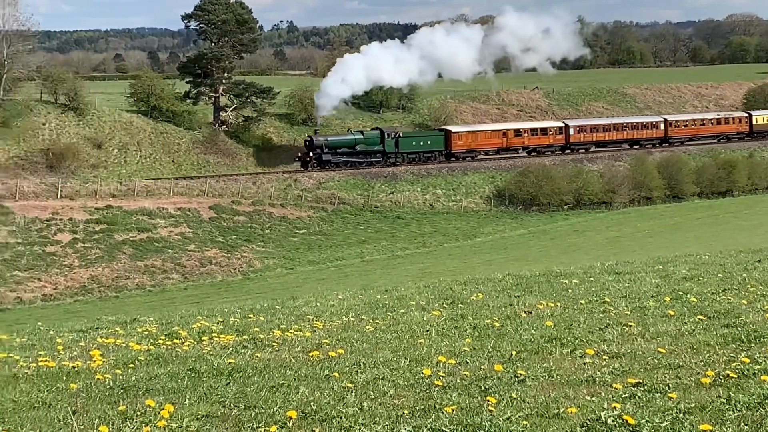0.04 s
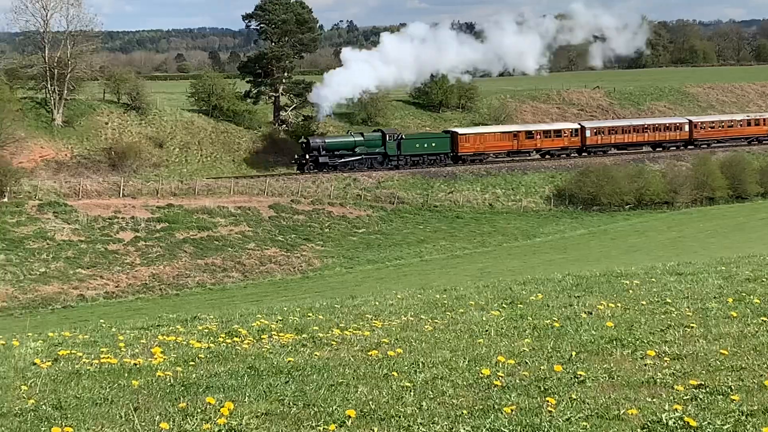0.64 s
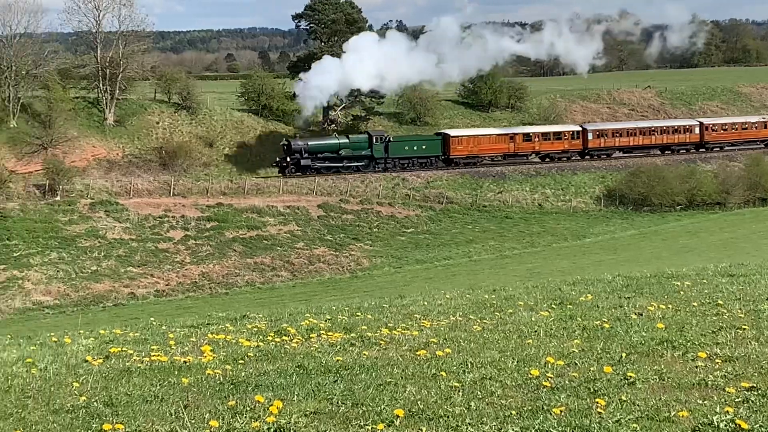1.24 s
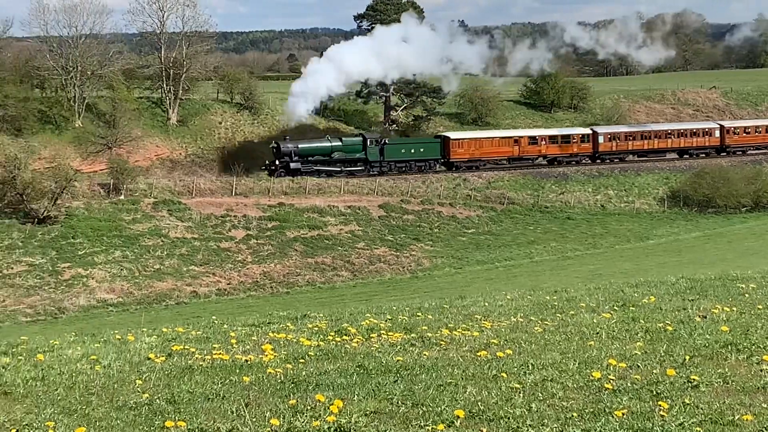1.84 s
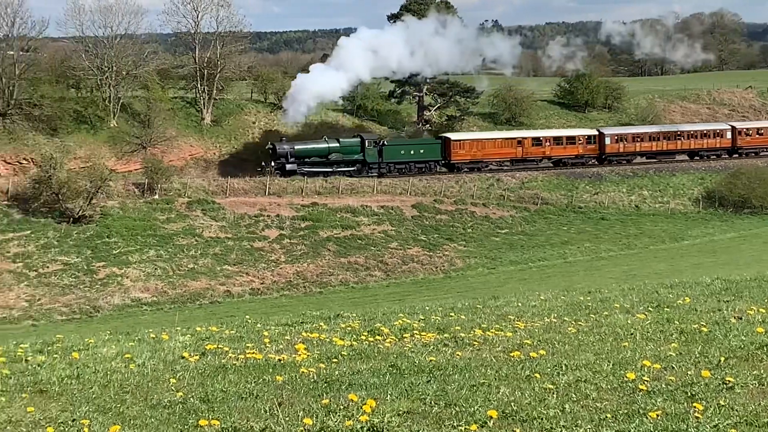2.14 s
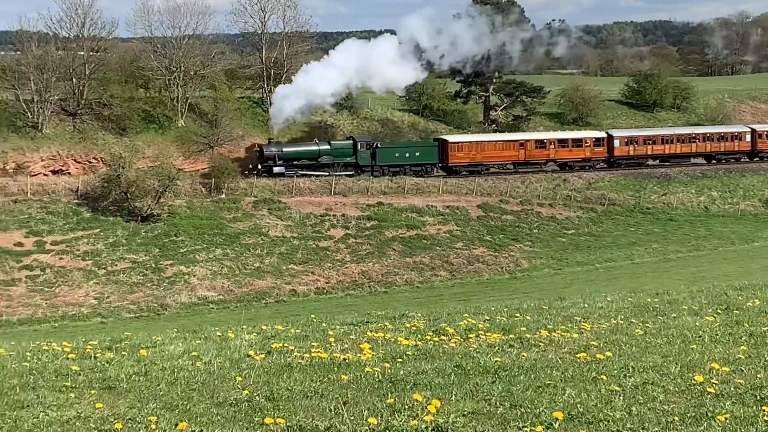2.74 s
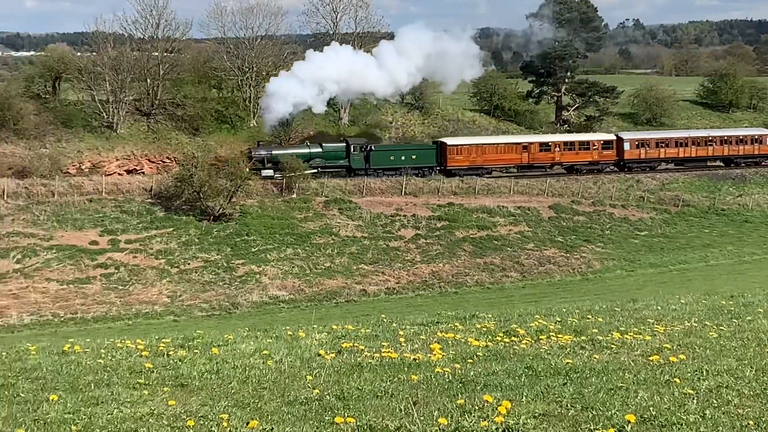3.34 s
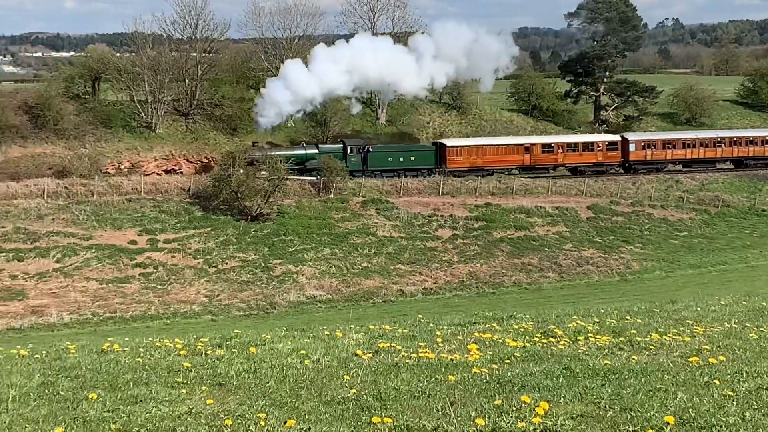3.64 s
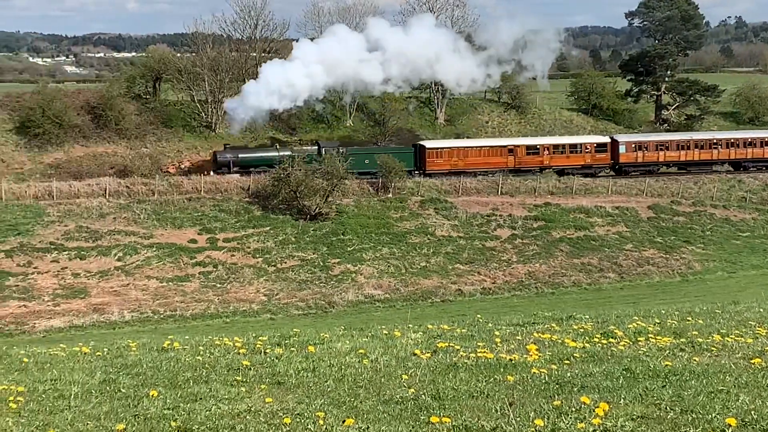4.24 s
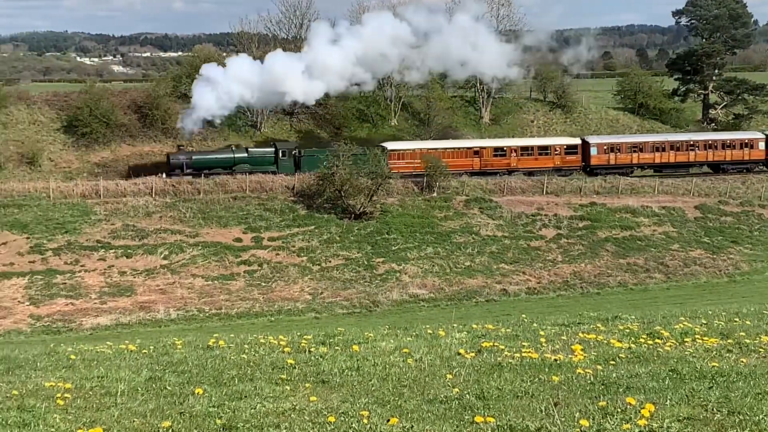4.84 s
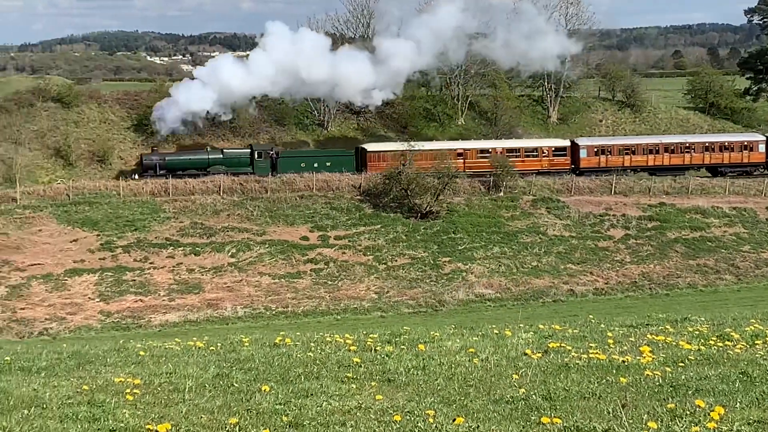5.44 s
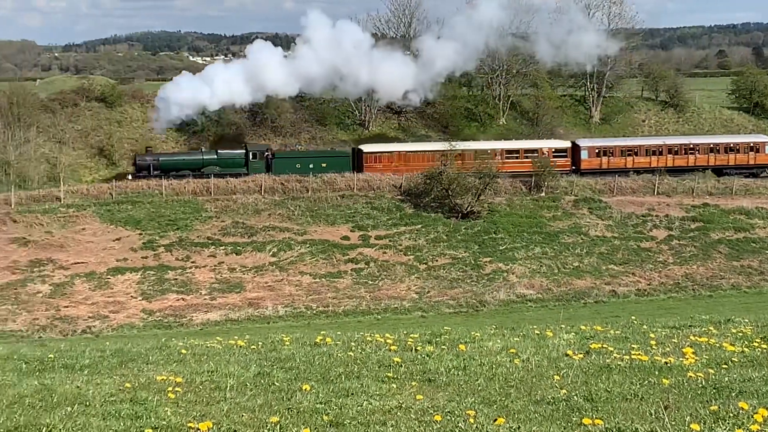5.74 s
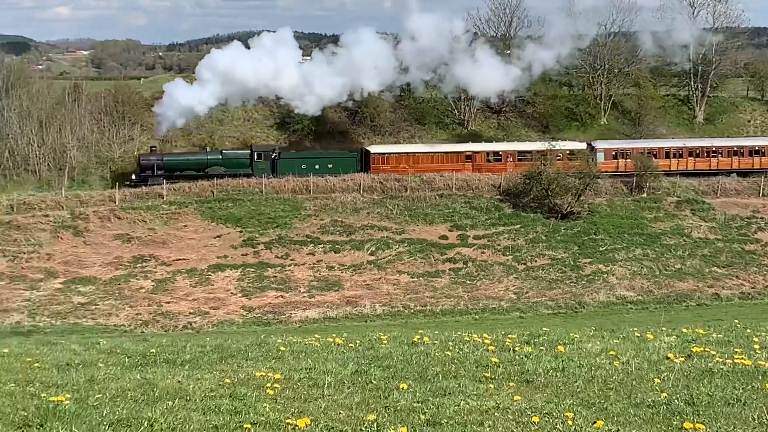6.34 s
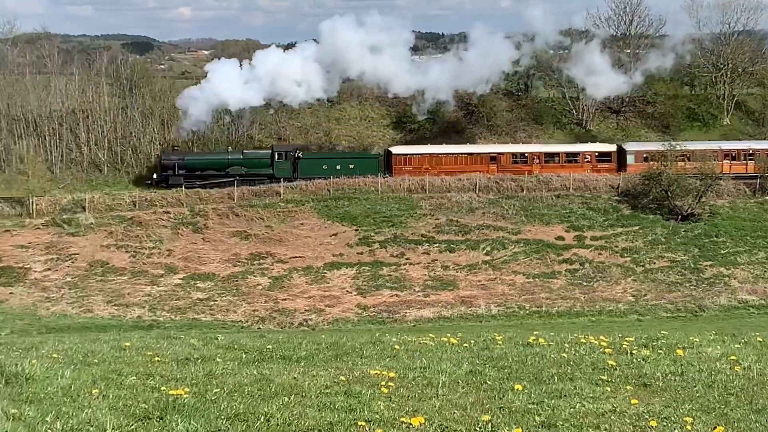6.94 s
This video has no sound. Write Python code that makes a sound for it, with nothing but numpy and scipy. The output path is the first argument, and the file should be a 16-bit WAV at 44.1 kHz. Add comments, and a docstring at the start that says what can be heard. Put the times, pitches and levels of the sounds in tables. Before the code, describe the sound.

Fast, even chuffing of a passing steam train, with raspy steam hiss, a low rumble and faint wheel squeals.

```python
"""A steam locomotive climbs past across a field at nine exhaust beats a second, its coaches rumbling behind.
Each beat is a turbulent jet of steam: a bark with rasp and hiss above it, and a resonant boom of
chimney and smokebox. The heaviest beats thump and crack; now and then a wheel flange sings thinly,
and three faint ticks sound close by. The bank behind the line reflects the beats, and interference
with the bounce off the grass hollows out the low middle."""
import sys
import numpy as np
from scipy import signal
from scipy.fft import rfft, irfft
from scipy.io import wavfile
from scipy.ndimage import uniform_filter1d, minimum_filter1d

SR = 44100
rng = np.random.default_rng(int(sys.argv[2]) if len(sys.argv) > 2 else 0)


def transcribe(signal):
    """Save signal, clipped to [-1, 1], as a 16-bit WAV file at the path in sys.argv[1]."""
    frames = np.atleast_2d(signal).T
    limited = np.clip(frames, -1, 1)
    pcm = np.round(limited * 32767).astype(np.int16)
    wavfile.write(sys.argv[1], SR, pcm)


N = 312209
T = np.arange(N) / SR
FRAME_S, BIN_HZ = np.arange(N // 512 + 5) * 512 / SR, np.fft.rfftfreq(2048, 1 / SR)
LEAN_DB, LEAN_DB_PER_S = 0.5, 0.26  # left over right: the train drifts to the left

# Uneven valve setting, one row for each beat of a wheel turn: delay/s, strength/dB
VALVES = [(-0.0019, 1), (-0.0026, 0.7), (-0.0051, 0.25), (-0.009, 0.3)]
# Swelling and fading of the exhaust as it carries over the field: t/s, gain/dB
CARRY = [(0.02, 3), (0.67, -4), (1.33, 2), (1.44, -0.1), (1.77, -1.3), (2.1, 0.5), (2.44, -2), (3.76, 0.5),
         (4.32, -1.0), (4.43, 1.5), (4.76, -1.5), (4.87, 0), (5.1, 2), (6.1, -2), (6.33, 1.0), (6.77, -1.5),
         (6.88, 1), (7.0, 2.6)]
# Approach of the engine: t/s, nearness (0 to 1)
NEARNESS = [(0, 0), (2.3, 0), (3.7, 0.3), (4.5, 0.48), (5.7, 1), (7.1, 0.96)]
# Relative levels of bark, hiss, boom and rolling wheels: t/s, level/dB
BARK_LEVEL = [(0, -25), (.8, -24.5), (1.33, -22.5), (1.7, -25), (2.8, -25), (3.3, -23.3), (4, -23.5),
              (4.55, -25), (5.05, -22.5), (6.4, -23.5), (7, -24)]
HISS_LEVEL = [(0.02, -42.5), (1.55, -42), (1.88, -48.5), (2.33, -45), (2.44, -52), (2.66, -41.5),
              (3.54, -46.5), (3.76, -38), (4.1, -47), (4.21, -39), (5.32, -44.5), (5.54, -36.5),
              (5.65, -42.5), (6.44, -38.5), (6.55, -42), (7.0, -38.5)]
BOOM_LEVEL = [(0.02, -19), (1.22, -17), (1.44, -20), (2.3, -19), (3.5, -17.5), (4.54, -18), (4.65, -20.5),
              (4.99, -17.5), (5.32, -19), (6.2, -17), (7.0, -17)]
RUMBLE_LEVEL = [(0, -29.5), (.9, -23), (1.5, -42), (2.3, -30.5), (3.2, -27.5), (4.2, -32.5), (5, -33.5),
                (5.7, -27.5), (6.4, -26.5), (7.1, -32)]
# Spectral shapes of the jet, the chimney, the steam cloud and the wheels: f/Hz, level/dB
BARK_SPECTRUM = [(150, -19.5), (260, 0), (420, -2.5), (540, 0), (680, -1), (950, -2.5), (1250, -2),
                 (1600, -8.5), (2200, -32), (4000, -57), (8000, -81)]
RASP_SPECTRUM = [(600, -34.5), (1150, -4.5), (1500, -1), (1800, 0), (2100, 0), (2350, -4.5), (2650, -4.5),
                 (3000, -9.5), (3600, -7.5), (5000, -29), (8000, -41.5)]
HISS_SPECTRUM = [(1500, -19), (3100, 5), (4000, 3), (5000, 0), (6000, -2), (7300, -9), (8400, -22),
                 (9500, -18.5), (10300, -22), (11200, -29), (12000, -60), (13000, -105)]
BOOM_SPECTRUM = [(50, -36), (85, -25.5), (115, -3), (145, -2.4), (185, 0.8), (210, -4), (240, -10),
                 (300, -16), (450, -49), (1000, -87.5), (3000, -140)]
PUFF_SPECTRUM = [(15, -48), (28, -17.5), (40, -9), (55, 1), (70, 1), (100, -6.5), (200, -37.5), (500, -96)]
RUMBLE_SPECTRUM = [(10, -55.5), (24, -33), (36, -9.5), (50, -9.5), (62, -2), (80, -15), (130, -2),
                   (200, -11), (350, -13.5), (900, -19.5), (2500, -36), (7000, -58.5), (11000, -88),
                   (12500, -110)]
# Beats that stand out from their neighbours: t/s, bark gain/dB, rasp gain/dB, hiss gain/dB
ACCENTS = [(.02, 2, -4.5, 0), (.13, -2, -2, 0), (.24, 1, 0.5, 0), (.57, 0.5, -1.5, 1), (.78, -2, -1, -2.5),
           (.89, -1.5, -0.5, 3), (1.11, 3, -1, -0.5), (1.22, 2.5, -0.5, 0), (1.33, 1.5, 0, 0),
           (1.44, -2, 0, 2), (1.66, 1.5, 1.5, 0.5), (2.66, 0, 1, 0), (2.99, 0, 0.5, 1.5),
           (3.1, 0.5, -2, -2.5), (3.32, -1, 0.5, 4), (3.54, -1, -1.5, 2), (3.65, -0.5, 1, 0),
           (3.87, -0.5, 0.5, 4.5), (4.21, 0, 2, 4), (4.43, 1, -2.5, 1), (4.87, 1, 0, -2),
           (4.99, -1, 1, 2.5), (5.1, 2, -1, 2.5), (5.32, 0.5, -1.5, -0.5), (5.65, 1, 0.5, -1),
           (5.77, -1.5, 0, 1.5), (5.88, -2, -1.5, -0.5), (6.44, 2, 0, 1.5), (6.77, 1, 1, 0.5),
           (6.89, 1.5, -0.5, 0.5), (7.0, -1, -1.5, 1)]
# Sharp cracks at the height of some blasts: t/s, gain/dB
CRACKS = [(.045, 1.5), (.594, 4.5), (.711, 2), (1.239, 3), (1.373, 0.5), (3.238, 0.5), (4.678, 2.5),
          (4.898, 1), (5.135, 2), (5.68, 2), (5.796, 1.5), (6.464, 2.5), (6.911, 6), (7.03, 2)]
# Brightening of a harder spurt: f/Hz, gain per flow level/(dB/dB)
SPIT = [(5500, 0), (8000, 0.15), (10000, 0.4)]
# Shaking of the highest hiss by gusts: f/Hz, depth/dB
GUST_DEPTH = [(5000, 0), (7000, 1.2), (10000, 2)]
# Treble of the steam, from its own brightness and from surges of wind: t/s, gain/dB
BRIGHTNESS = [(0, -6), (.7, -7), (1.6, 0), (2.3, 3), (2.9, 1.5), (3.7, 3), (4.5, -4), (5.7, -3), (7.1, -9)]
WIND_SURGES = [(0, 3), (.67, -1.5), (.89, 2), (1.1, 1), (1.55, 2), (1.9, 1.5), (2.1, 2.5), (3.65, 1.5),
               (3.82, -0.5), (4, -3.5), (4.5, 1), (5.43, -4), (5.9, -3.5), (6.1, 1), (6.21, -3),
               (6.44, 1.5), (6.66, -3.5), (7, -0.5)]
# Colour that the engine gains as it comes abreast: f/Hz, gain/dB
ABREAST_COLOUR = [(105, 0), (190, -2.5), (270, 4.5), (325, 16.5), (410, -2), (620, 4.5), (950, -7),
                  (1300, 0.5), (1700, -3), (2200, -0.5), (3000, -2.5), (4000, -3.5), (7000, 4.5)]
# A close reflection combs the steam into a metallic ring that glides upward: t/s, delay/s
COMB_DELAY = [(0, .002125), (2, .00205), (3, .00202), (3.7, .00194), (4.5, .00187), (7.1, .00172)]
# Strength of that comb: f/Hz, depth/dB
COMB_DEPTH = [(1200, 1), (2200, 1), (3500, 2.5), (5300, 2.5), (6500, 2)]
# Likeness of the sound at the two microphone ports: f/Hz, coherence (0 to 1)
PORT_COHERENCE = [(60, .998), (300, .995), (500, .96), (1200, .965), (2600, .91), (3600, .65), (5400, .62),
                  (6600, .85), (8500, .95)]
# Left port over right, on top of the direction: f/Hz, level/dB
PORT_COLOUR = [(100, 0.25), (250, -0.5), (370, -1), (550, 0), (720, 3), (900, -3.5), (1300, 0.5),
               (2000, -2), (2800, -3), (4000, -3.5), (5600, -7), (6600, -3), (12000, -1.5)]
# Lead of the left port: f/Hz, phase/rad
PORT_LEAD = [(100, 0), (230, 0), (310, 0.4), (390, -0.4), (520, 0.32), (860, 0.3), (1200, 0.24),
             (1550, 0.31), (2150, .5), (2930, 0.99), (3800, 2), (4500, 1.17), (5300, 2.1), (5900, 0.9),
             (7100, -1.5), (7700, -1), (8300, -8.5), (9400, -3.5), (10300, -6.5)]
# Flange squeals: t/s, duration/s, f/Hz, relative level/dB
SQUEALS = [(0, .34, 5000, -53), (.62, 0.18, 4060, -50), (4.3, 0.68, 4390, -51), (4.93, .14, 4080, -43),
           (6.95, .09, 4900, -43), (6.99, 0.095, 3800, -44.5)]
# Heaviest thumps of the chimney: t/s, relative level/dB, f/Hz
THUMPS = [(0.059, -10.5, 194), (.15, -9, 155.5), (0.395, -7.5, 149.7), (.474, -7, 173), (.592, -8, 166),
          (0.694, -8.5, 181.4), (.803, -10.5, 171.3), (.918, -7, 180.7), (1.032, -7, 181),
          (1.139, -4.5, 161), (1.257, -6, 170.7), (1.359, -8, 179), (1.468, -9, 153), (1.698, -7.5, 156),
          (1.923, -10.5, 165.4), (2.026, -8, 180), (2.607, -11.5, 140.4), (2.677, -10.5, 191),
          (2.719, -10, 164.4), (2.9, -10, 193.5), (3.067, -8, 180.4), (3.241, -10, 187.4),
          (3.451, -7.5, 182), (3.603, -11, 194), (3.783, -9, 178), (4.368, -10.5, 149),
          (4.468, -8.5, 173.4), (4.566, -7.5, 186.4), (5.388, -8.5, 163.4), (5.473, -9, 180),
          (5.563, -11.5, 196.4), (5.798, -11, 170), (5.918, -8, 192.6), (6.175, -7.5, 180.4),
          (6.35, -12.5, 176), (6.465, -9.5, 159), (6.576, -6, 187), (6.723, -9, 179), (6.843, -10, 167.4),
          (6.931, -8, 169.6), (7.017, -10, 147)]
# Faint high ticks close by: t/s, relative level/dB
TICKS = [(.912, -44), (1.245, -46), (1.574, -43)]


def gain_of(db):
    """Amplitude ratio: tenfold for every 20 dB."""
    return 10 ** (np.asarray(db) / 20)


def unit_rms(x):
    """Normalisation to a mean power of one."""
    return x / np.sqrt(np.mean(x ** 2) + 1e-20)


def per_bin(table):
    """Interpolation over log frequency, as a column of one value per bin."""
    hz, value = np.transpose(table)
    return np.interp(np.log(BIN_HZ + 1), np.log(hz + 1), value)[:, None]


def follow(table, t):
    """Linear interpolation over time."""
    return np.interp(t, *np.transpose(table))


def add(mix, start_s, sound):
    """Superposition of a sound on the mix."""
    part = mix[..., max(round(start_s * SR), 0):][..., :sound.shape[-1]]
    part += sound[..., :part.shape[-1]]


def flutter(hz):
    """Random fluctuation of unit rms, low-passed at hz."""
    rolloff = 1 + (np.fft.rfftfreq(N, 1 / SR) / hz) ** 4
    return unit_rms(irfft(rfft(rng.standard_normal(N)) / rolloff, N))


def ragged(depth_db, hz):
    """Random amplitude modulation, heard as roughness."""
    return unit_rms(gain_of(depth_db * np.tanh(flutter(hz) / 2) * 2))


def placed(x):
    """The level difference between left and right gives a sound the direction of the engine."""
    return x * gain_of(np.array([[.5], [-.5]]) * (LEAN_DB + LEAN_DB_PER_S * T))


def noise(colour_db):
    """Partial coherence: coloured noise reaches two ports with unequal phase and level."""
    a, b, c, d = rng.standard_normal((len(FRAME_S), len(BIN_HZ), 4)).T
    coherence = np.clip(per_bin(PORT_COHERENCE), 0, 1)
    left, independent = a + 1j * b, c + 1j * d
    right = coherence * left + np.sqrt(1 - coherence ** 2) * independent
    right *= np.exp(-1j * per_bin(PORT_LEAD))
    lean_db = LEAN_DB + LEAN_DB_PER_S * FRAME_S + per_bin(PORT_COLOUR)
    spectra = np.array([left * gain_of(lean_db / 2), right * gain_of(-lean_db / 2)]) * gain_of(colour_db)
    return unit_rms(signal.istft(spectra, nperseg=2048, noverlap=1536)[1][:, :N])


def across_field(spectrum, ripple_db):
    """Propagation colours a spectrum (dB) through nearness, wind, comb interference and scattering."""
    approach_db = per_bin(ABREAST_COLOUR) * (follow(NEARNESS, FRAME_S) - .5)
    treble_share = per_bin([(4500, 0.03), (6000, 0.99)])
    treble_db = treble_share * (follow(BRIGHTNESS, FRAME_S) + follow(WIND_SURGES, FRAME_S))
    comb_db = per_bin(COMB_DEPTH) * np.cos(2 * np.pi * BIN_HZ[:, None] * follow(COMB_DELAY, FRAME_S))
    ripple = rng.standard_normal((len(FRAME_S), len(BIN_HZ))).T
    ripple = unit_rms(uniform_filter1d(uniform_filter1d(ripple, size=4, axis=0), size=22, axis=1))
    ripple *= np.minimum(BIN_HZ / 1300, 1)[:, None]  # long waves scatter less
    return per_bin(spectrum) + approach_db + treble_db - comb_db + ripple_db * ripple


def beats(first_s=.0174, period_s=.10946, slowing_s_per_beat=.0000422):
    """Four beats to a wheel turn, slowed by the gradient: their starts (s) and strengths (dB)."""
    k = np.arange(int(N / SR / period_s))
    late_s, strength_db = np.array(VALVES)[k % len(VALVES)].T
    return first_s + k * (period_s + slowing_s_per_beat * k / 2) + late_s, strength_db


def blasts(level_db, delay_s, rise_s, hold_s, fall_s, leak_db, shut_s=0.11):
    """Pulsed flow: a cylinder empties at each beat, adding in power to the draught between beats."""
    starts, _ = beats()
    t, power = np.arange(SR // 3) / SR, np.zeros(N)
    opening = np.sin(np.pi / 2 * np.minimum(t / rise_s, 1)) ** 2
    emptying = np.exp(-np.maximum(t - rise_s - hold_s, 0) / fall_s)
    pulse = opening * emptying / (1 + (t / shut_s) ** 14)  # the closing valve chokes the blast
    pulse *= np.mean(np.diff(starts)) * SR / pulse.sum()  # unit mean power over a beat
    for s, db in zip(starts, level_db):
        add(power, s + delay_s, gain_of(db) ** 2 * pulse)
    draught = gain_of(np.interp(T, starts, level_db) + leak_db)
    return np.sqrt(power + draught ** 2)


def jet_levels():
    """Fading in transit: bark, rasp and hiss levels (dB) of each beat move together, the bark least."""
    starts, strength_db = beats()
    carry_db = follow(CARRY, starts)
    bark_db = follow(BARK_LEVEL, starts) + strength_db + 0.43 * carry_db
    rasp_db = -27.5 + strength_db + 2.28 * carry_db - 0.5 * follow(NEARNESS, starts)
    hiss_db = follow(HISS_LEVEL, starts) + 0.7 * carry_db
    for s, *extras_db in ACCENTS:
        for level_db, extra_db in zip((bark_db, rasp_db, hiss_db), extras_db):
            level_db[np.argmin(abs(starts - s))] += extra_db
    return bark_db, rasp_db, hiss_db


def jet_bark(level_db):
    """Pulsed jet noise in the low middle gives each beat its body."""
    flow = blasts(level_db, delay_s=-0.0053, rise_s=0.031, hold_s=0.018, fall_s=0.032, leak_db=-7)
    return noise(across_field(BARK_SPECTRUM, ripple_db=3)) * flow


def jet_rasp(level_db, edge_hz=2906, edge_hz_per_db=58.5):
    """Band-limited jet noise, whose steep upper edge rises with the brightness of the steam."""
    cutoff_hz = edge_hz + edge_hz_per_db * follow(BRIGHTNESS, FRAME_S)
    rolloff_db = -10 * np.log10(1 + (BIN_HZ[:, None] / cutoff_hz) ** 18)
    flow = blasts(level_db, delay_s=-0.0041, rise_s=0.034, hold_s=.017, fall_s=0.026, leak_db=-9)
    return noise(across_field(RASP_SPECTRUM, ripple_db=2.5) + rolloff_db) * flow


def jet_hiss(level_db):
    """Jet noise brightens with the flow, and gusts modulate its highest frequencies."""
    flow = blasts(level_db, delay_s=-0.0045, rise_s=0.037, hold_s=0.0076, fall_s=0.024, leak_db=-6)
    spit_db = per_bin(SPIT) * np.interp(FRAME_S, T, 20 * np.log10(unit_rms(flow)))
    gust_db = per_bin(GUST_DEPTH) * np.interp(FRAME_S, T, flutter(hz=7))
    return noise(across_field(HISS_SPECTRUM, ripple_db=1.9) + spit_db + gust_db) * flow


def exhaust(crack_s=.007):
    """Turbulence: the jet tears into eddies, so its loudness jumps about within each beat."""
    bark_db, rasp_db, hiss_db = jet_levels()
    bark, rasp, hiss = jet_bark(bark_db), jet_rasp(rasp_db), jet_hiss(hiss_db)
    eddies = ragged(depth_db=1.28, hz=200)
    sputter = ragged(depth_db=1.6, hz=90)
    cracks = gain_of(sum(db * np.exp(-((T - s) / crack_s) ** 2 / 2) for s, db in CRACKS))
    return cracks * eddies * (bark + rasp) + sputter * hiss


def chimney():
    """Cavity resonance: blasts set smokebox and chimney booming; the swelling cloud adds a deep puff."""
    starts, strength_db = beats()
    boom_db = follow(BOOM_LEVEL, starts) + strength_db
    boom = noise(across_field(BOOM_SPECTRUM, ripple_db=9.5))
    # each cylinder lets out a set amount of steam, so the boom is steadier than plain noise
    local_power = uniform_filter1d((boom ** 2).mean(0), size=2600)
    boom = unit_rms(boom / local_power ** .35)
    boom *= blasts(boom_db, delay_s=.002, rise_s=0.022, hold_s=0.0073, fall_s=0.08, leak_db=-4)
    puff = noise(per_bin(PUFF_SPECTRUM))
    puff *= blasts(strength_db, delay_s=.005, rise_s=0.029, hold_s=0.034, fall_s=0.018, leak_db=-12.5)
    return gain_of(-2) * boom + gain_of(-35) * puff


def coaches():
    """Rolling noise of wheels on rails: a deep rumble with a faint roar above it."""
    return gain_of(follow(RUMBLE_LEVEL, T)) * noise(per_bin(RUMBLE_SPECTRUM))


def flange_squeals(waver=0.0033, waver_hz=60):
    """Friction excites a thin, wavering tone while a wheel flange touches the rail."""
    tones, wobble = np.zeros(N), 1 + waver * flutter(waver_hz)
    for s, length_s, hz, db in SQUEALS:
        swell = np.sin(np.pi * np.clip((T - s) / length_s, 0, 1))
        tones += gain_of(db) * swell * np.sin(2 * np.pi * np.cumsum(hz * wobble) / SR)
    return placed(tones * ragged(depth_db=7, hz=70))


def ground_bounce(x, start_hz=525, sag_hz_per_s=20.7, width_octaves=0.23):
    """Destructive interference off the grass cuts a notch that sinks and deepens as the train nears."""
    hz, t, spectra = signal.stft(x, SR, nperseg=1024, noverlap=768)
    octaves_off = np.log2((hz[:, None] + 1) / (start_hz - sag_hz_per_s * t))
    depth_db = 5 + 11 * follow(NEARNESS, t)
    dip_db = depth_db * np.exp(-(octaves_off / width_octaves) ** 2)
    return signal.istft(spectra * gain_of(-dip_db), SR, nperseg=1024, noverlap=768)[1][:, :N]


def bank_echo(x, first_s=0.038, t60_s=0.35, echoes_per_s=800, common=0.31):
    """Scattering from the bank and trees behind the line returns echoes, partly alike in both ports."""
    t = np.arange(SR // 2) / SR
    echoes = rng.standard_normal((3, len(t))) * (rng.random((3, len(t))) < echoes_per_s / SR)
    shared, left, right = echoes * (t > first_s) * gain_of(-60 * t / t60_s)
    response = common * shared + (1 - common) * np.array([left, right])
    response /= np.linalg.norm(response, axis=1, keepdims=True)
    return signal.fftconvolve(x, response, axes=1)[:, :N]


def with_thumps(boom, rise_s=.01, fall_s=0.0094, sag=0.083, takeover=0.63):
    """In the heaviest blasts the resonance rings a few clean cycles, sagging as the pressure drops."""
    t = np.arange(-4 * rise_s, 5 * fall_s, 1 / SR)
    tones, presence = np.zeros(N), np.zeros(N)
    envelope = np.exp(-(t / np.where(t < 0, rise_s, fall_s)) ** 2 / 2)
    for (s, db, hz), phase in zip(THUMPS, rng.random(len(THUMPS))):
        cycles = np.cumsum(hz * (1 - sag * np.tanh(t / fall_s))) / SR + phase
        add(tones, s + t[0], gain_of(db) * envelope * np.sin(2 * np.pi * cycles))
        add(presence, s + t[0], envelope)
    return boom * (1 - takeover * presence) + gain_of(-0.43) * placed(tones)


def ticks(rise_s=.004, decay_s=.005, tail_db=-15, tail_s=.035, band_hz=(8500, SR / 3.2)):
    """Three soft noise transients, each decaying exponentially into a faint rough rustle."""
    t, bursts = np.arange(-SR // 20, SR // 8) / SR, np.zeros((2, N))
    decay = np.exp(-abs(t) / decay_s) + gain_of(tail_db) * np.exp(-abs(t) / tail_s)
    envelope = np.where(t < 0, np.exp(-abs(t) / rise_s), decay)
    for s, db in TICKS:
        add(bursts, s + t[0], gain_of(db) / 2 * envelope * rng.standard_normal((2, len(t))))
    band = signal.butter(1, band_hz, "band", fs=SR, output="sos")
    return signal.sosfilt(band, bursts * ragged(depth_db=5, hz=250))


def limit(x, ceiling=.88):
    """Peak limiting: the gain dips smoothly for a few milliseconds around the tallest peaks."""
    allowed_gain = np.minimum(ceiling / (abs(x).max(0) + 1e-9), 1)
    held_gain = minimum_filter1d(allowed_gain, size=301)
    return x * uniform_filter1d(uniform_filter1d(held_gain, size=151), size=151)


def scene():
    """Superposition of the train heard over the grass, the echo of its exhaust, squeals and ticks."""
    jet = exhaust()
    train = ground_bounce(jet + with_thumps(chimney()) + coaches())
    return train + gain_of(-19) * bank_echo(jet) + flange_squeals() + ticks()


def record(dry, low_cut_hz=38.6, band_limit_hz=15500):
    """High-pass filtering at the microphone, then peak limiting and a steep low-pass."""
    low_cut = signal.butter(5, low_cut_hz, "high", fs=SR, output="sos")
    band_limit = signal.ellip(10, .1, 80, band_limit_hz, fs=SR, output="sos")
    return signal.sosfilt(band_limit, limit(signal.sosfilt(low_cut, dry)))


dry = scene()
out = record(dry)
transcribe(out)
```